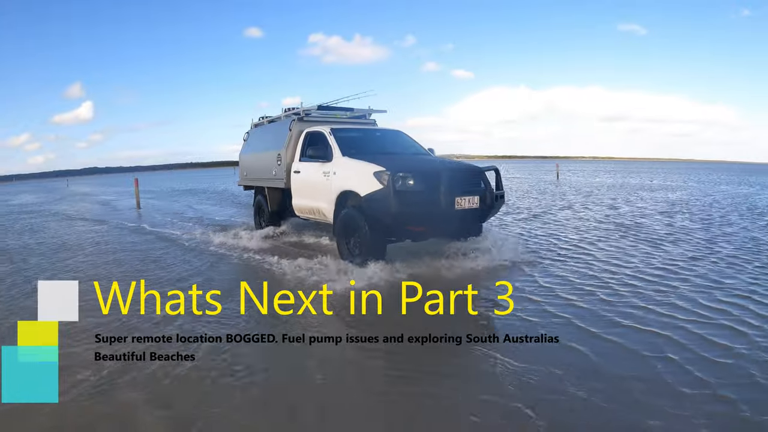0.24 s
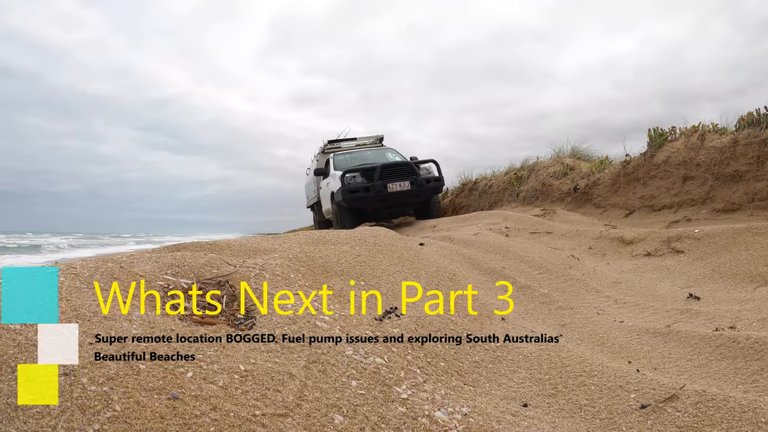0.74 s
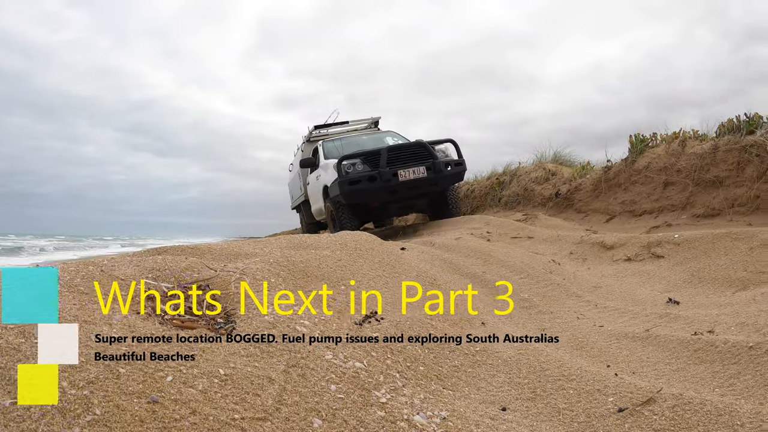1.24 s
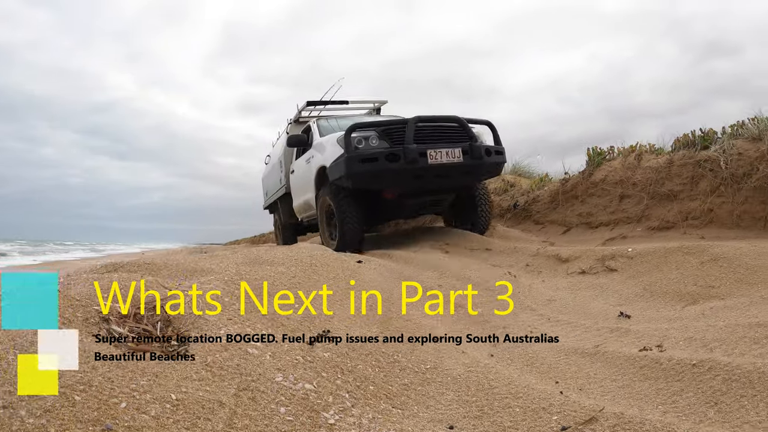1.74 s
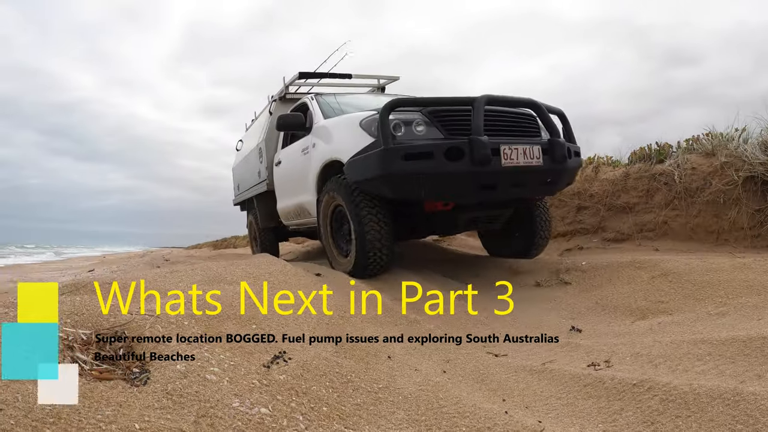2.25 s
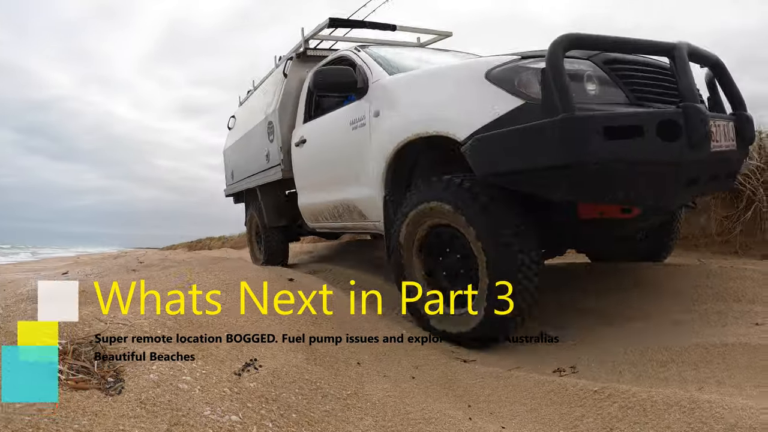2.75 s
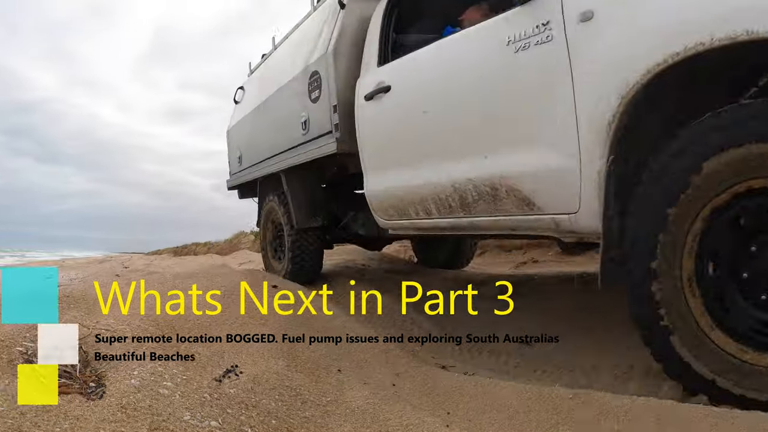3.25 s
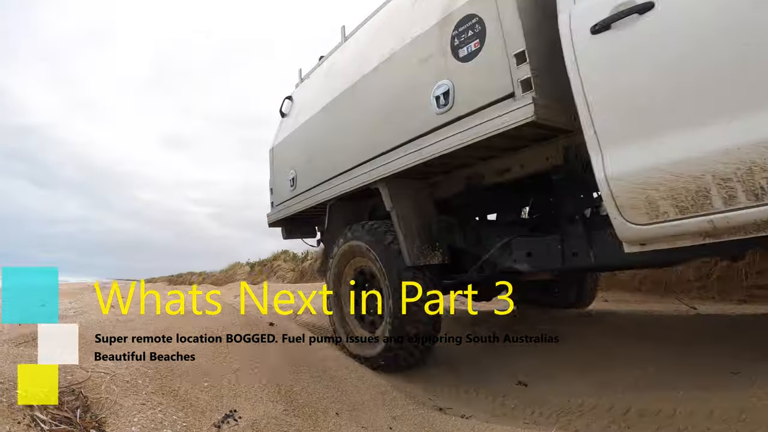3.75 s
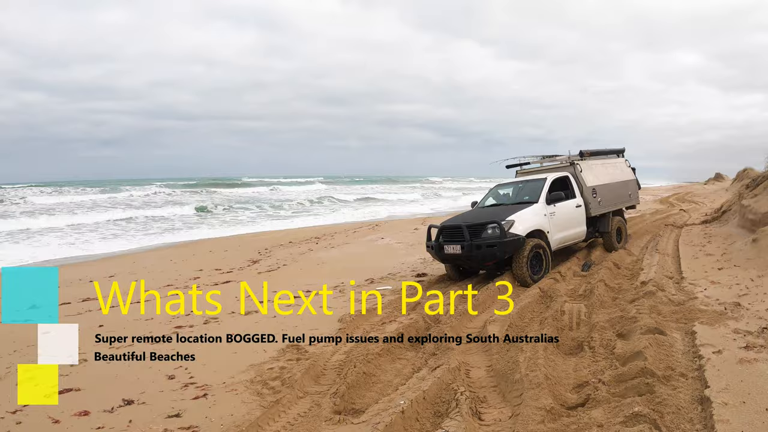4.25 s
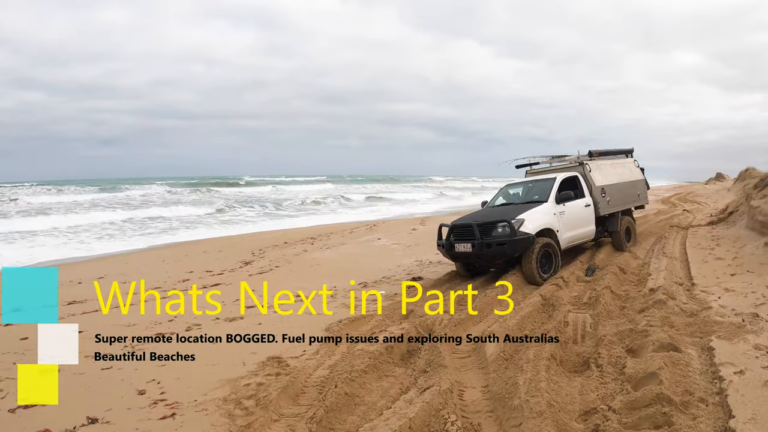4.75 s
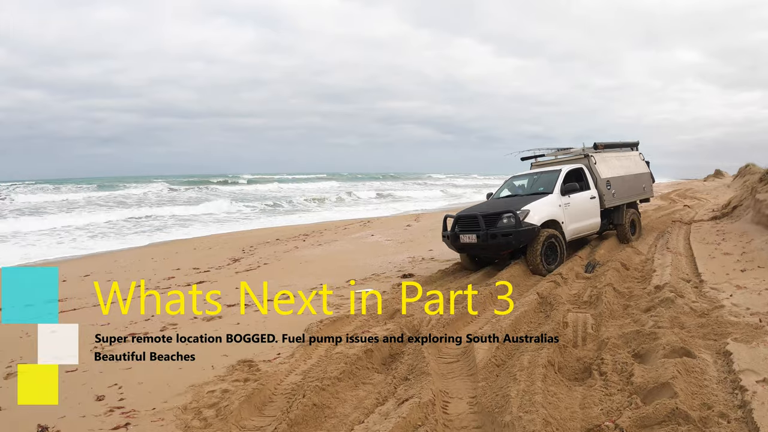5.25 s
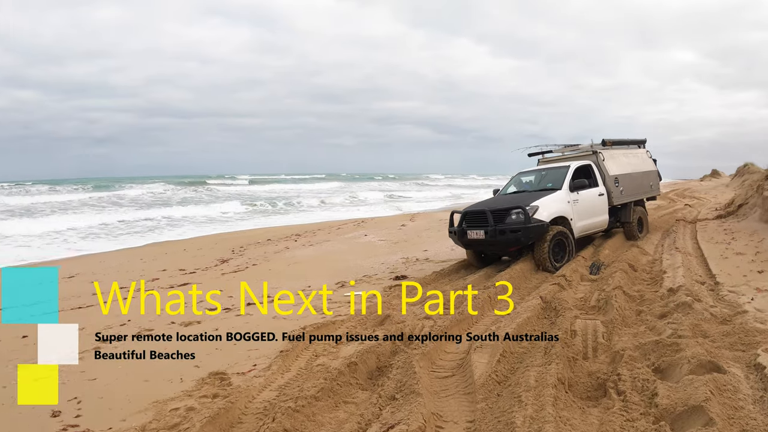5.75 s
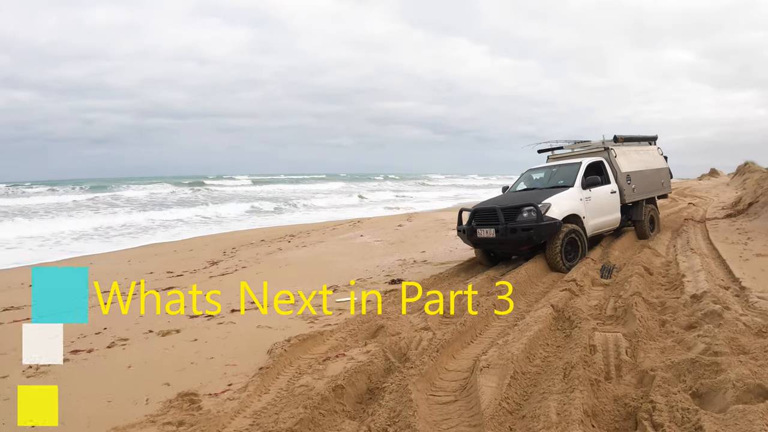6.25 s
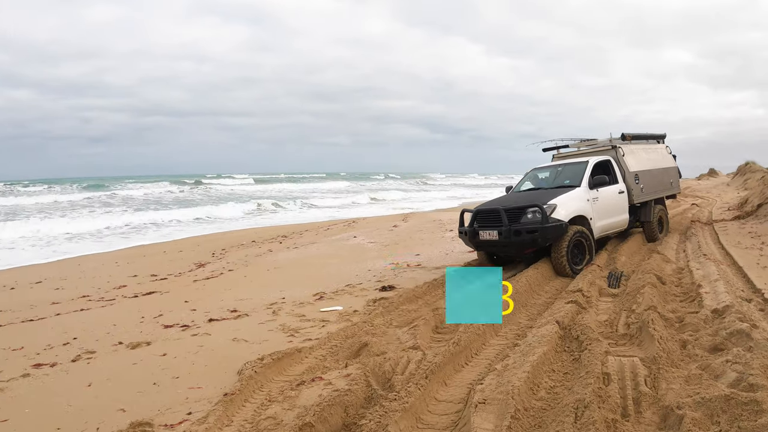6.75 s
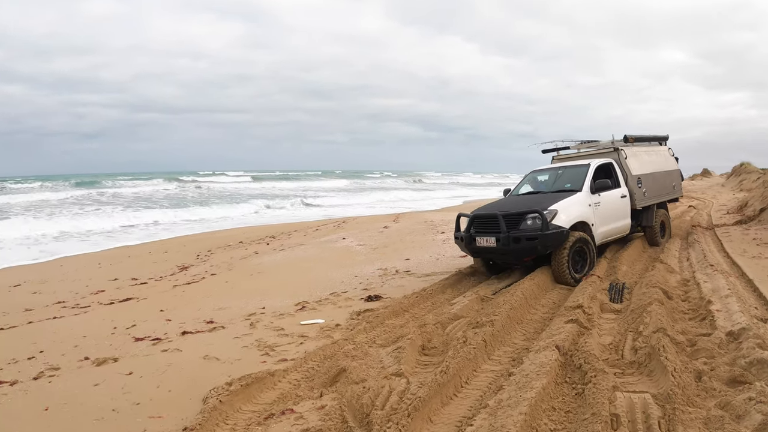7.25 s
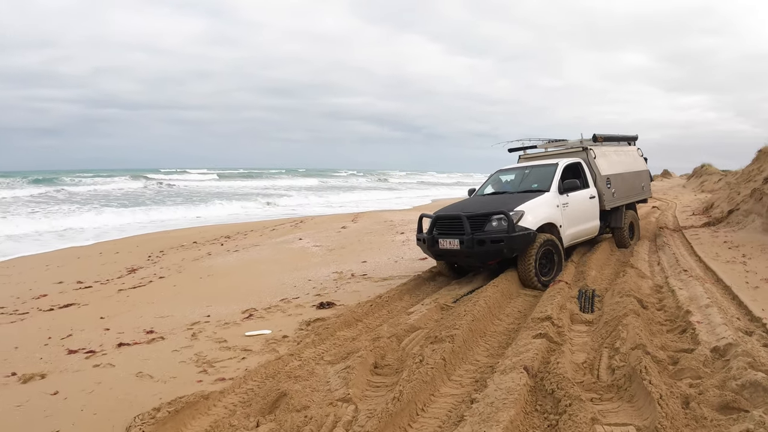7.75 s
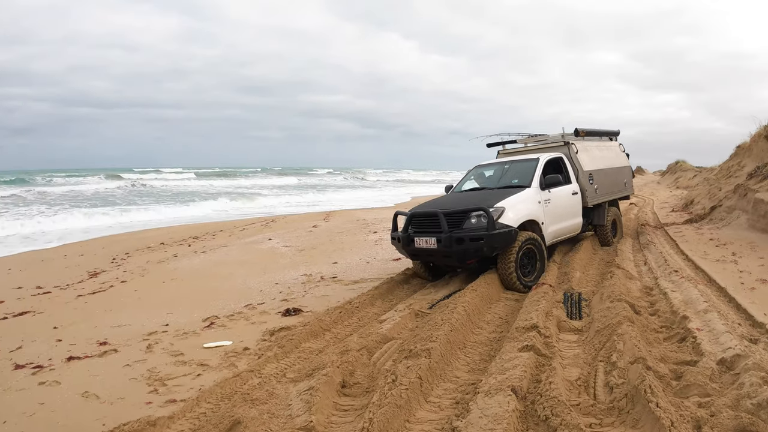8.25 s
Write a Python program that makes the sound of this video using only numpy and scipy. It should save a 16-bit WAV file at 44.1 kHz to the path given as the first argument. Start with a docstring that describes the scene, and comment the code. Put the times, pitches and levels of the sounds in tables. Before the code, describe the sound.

A vehicle ploughs through shallow water for a moment, slapping and bubbling. Abruptly it is on soft sand, a low diesel throb with clattering knock, straining, dipping and revving again as it approaches and passes the microphone. Then, abruptly, an even exhaust drone on an open beach over steady breakers and soft foam hiss, slowly losing revs. Gusty wind rumbles throughout, with a few faint, thin metallic squeals.

```python
"""Water churns, bubbles and slaps as a four-cylinder diesel four-wheel drive ploughs through the shallows.
Then it climbs a dune past the microphone in three surges of throttle, and last drones beside the surf with
sagging revs. The exhaust is harmonics of the firing rate coloured by pipe resonances; on the dune noise
bursts knock on the block and shaped noise makes the sand. Wind rumbles on the microphone throughout."""
import sys
import numpy as np
from scipy import signal
from scipy.fft import rfft, irfft, next_fast_len
from scipy.io import wavfile
from scipy.ndimage import uniform_filter1d, map_coordinates

SR = 44100
rng = np.random.default_rng(int(sys.argv[2]) if len(sys.argv) > 2 else 0)


def bounce(signal):
    """Save signal as a 16-bit WAV file at the path given by the first command-line argument."""
    frames = np.transpose(np.atleast_2d(signal))
    limited = np.clip(frames, -1, 1)
    pcm = np.round(limited * 32767).astype(np.int16)
    wavfile.write(sys.argv[1], SR, pcm)


N = 374409

CLIMB_START, BEACH_START = .452, 4.268  # seconds
ALONGSIDE_S, CLEAR_S = 3.285, 0.33  # the tailpipe comes out from behind the truck, and how long that takes
SHADOW_S, SHADOW_FADE_S = 3.88, 0.26  # the body moves in front of the engine bay and front wheels
PIPE_HZ = 157  # resonance of the exhaust pipe on the dune

# Surges of throttle on the dune. Each row: start in seconds, attack in seconds, straining for seconds,
# pulling for seconds, release in seconds, pull 0-1, strain 0-1, extra knock in dB, extra pipe tone in dB.
THROTTLE_SURGES = [(.76, 0.48, 0.88, 0.93, 0.26, .7, 0.17, 3.5, 6.5),
                   (2.37, 0.16, 0.26, .56, 0.33, 1.0, 0.72, 11, 3),
                   (3.331, 0.15, .32, 0.94, .3, 1.0, 0.7, 8.5, 3.5)]


def amp(db):
    """Decibels to gain."""
    return 10 ** (np.asarray(db) / 20)


def unit(x):
    """Scale to rms 1."""
    return x / np.sqrt(np.mean(x ** 2) + 1e-20)


def curves(rows):
    """One value per sample for each column after the time."""
    s, *cols = np.transpose(rows)
    return [np.interp(np.arange(N) / SR, s, c) for c in cols]


def wobble(rate):
    """A smooth random curve, rate knots a second."""
    knots = rng.standard_normal(int(N * rate / SR) + 4)
    return map_coordinates(knots, [np.arange(N) * rate / SR])


def filtered(x, response):
    """x times a response of frequency."""
    size = next_fast_len(N + SR // 2)
    return irfft(rfft(x, size) * response(np.fft.rfftfreq(size, 1 / SR)), size)[:N]


def coloured(x, spectrum):
    """x shaped by (Hz, dB) points, at rms 1."""
    f, db = np.transpose(spectrum)
    return unit(filtered(x, lambda hz: amp(np.interp(np.log(hz + 1), np.log(f), db))))


def rush(spectrum, patchy_db):
    """Turbulent noise of rms 1, with patches of random gain in time and pitch."""
    z = signal.stft(rng.standard_normal(N), nperseg=512)[2]
    across_pitch = uniform_filter1d(rng.standard_normal(z.shape), size=6, axis=0)
    field = uniform_filter1d(across_pitch, size=10, axis=1)
    patchy = signal.istft(z * amp(patchy_db * unit(field)), nperseg=512)[1][:N]
    return coloured(patchy, spectrum)


def ringing(drive, centre_hz, width_hz):
    """One narrow resonance shaken by drive, at rms 1."""
    return unit(filtered(drive, lambda f: 1 / (1 + (2 * (f - centre_hz) / width_hz) ** 2)))


def shot(start, end):
    """Gate that is open for one scene."""
    t = np.arange(N) / SR
    return uniform_filter1d(1. * ((t >= start) & (t < end)), size=20)


def rise(start, length):
    """A smooth step from 0 to 1."""
    u = np.clip((np.arange(N) / SR - start) / length, 0, 1)
    return np.sin(np.pi / 2 * u) ** 2


def swell(peak, length):
    """A smooth hump from 0 to 1 and back."""
    return rise(peak - length / 2, length / 2) - rise(peak, length / 2)


def swells(rows, floor_db):
    """Gain of a floor with (peak s, length s, dB) humps added in power."""
    humps = sum(amp(db) ** 2 * swell(s, length) for s, length, db in rows)
    return np.sqrt(amp(floor_db) ** 2 + humps)


def wind(dune_db=-37, beach_db=-32):
    """A breeze buffets the microphone in gusts; it is fresher on the open beach."""
    # Each row: peak in seconds, length in seconds, level in dB.
    gusts = [(.2, 0.57, -19.5), (.8, 0.57, -23), (2.2, 0.97, -34.5), (4.37, 0.3, -25.5), (4.85, .4, -27.5),
             (5.28, 1, -24.5), (6.1, .6, -26), (6.76, 0.57, -27), (7.6, 0.87, -28.5), (8.47, .3, -25)]
    # Spectrum of air buffeting the microphone. Each row: frequency in Hz, relative level in dB.
    buffet = [(8, -23.5), (20, -9.5), (35, -6), (60, -4), (100, -14.5), (200, -12), (500, -53),
              (3000, -120)]
    breeze_db = dune_db + (beach_db - dune_db) * shot(BEACH_START, N / SR)
    return swells(gusts, floor_db=breeze_db) * coloured(rng.standard_normal(N), buffet)


def surf(breaker_db=-24.5, foam_db=-43):
    """Breakers roar steadily, waves rush up the sand and their foam hisses evenly, then drains away."""
    # Waves running up the sand. Each row: peak in seconds, length in seconds, level in dB.
    waves = [(4.47, 1, -42.5), (5.67, .3, -46), (6.25, 0.85, -46.5), (7.3, 0.55, -54), (8.15, 1, -53)]
    # Spectra of distant roar, water on sand, and foam. Each row: frequency in Hz, relative level in dB.
    breakers = [(20, -30), (60, -0.5), (120, 1), (210, -1), (300, -9), (420, -11.5), (580, -14),
                (1000, -27), (2000, -44), (16000, -120)]
    swash = [(200, -39.5), (600, -15.5), (950, 1.5), (1400, -5.5), (2500, -22.5), (16000, -86)]
    foam = [(100, -52), (900, -5), (1600, 0.5), (2600, -0.5), (4000, -4.5), (6000, -13), (8000, -17.5),
            (10000, -28), (12000, -38.5), (15500, -64.5)]
    foam_peak_s, foam_fade_db_per_s = 6.11, 2.5
    draining = np.maximum(np.arange(N) / SR - foam_peak_s, 0)
    roar = amp(breaker_db) * rush(breakers, patchy_db=1.0)
    run_up = swells(waves, floor_db=-49.5) * rush(swash, patchy_db=1.0)
    hiss = amp(foam_db - foam_fade_db_per_s * draining) * rush(foam, patchy_db=1.2)
    return roar + run_up + hiss


def squeals(waver_hz=80, flutter_db=4):
    """Rubbing metal in the running gear sings briefly, fluttering in pitch and strength."""
    # Each row: start in seconds, length in seconds, pitch in Hz, level in dB before the flutter.
    thin_squeals = [(1.88, 0.25, 9350, -63), (2.70, .15, 9400, -57), (2.83, .12, 9430, -64),
                    (5.48, 0.18, 8000, -58), (6.83, 0.1, 8500, -66), (6.93, .12, 7690, -62)]
    t, out = np.arange(N) / SR, np.zeros(N)
    waver, flutter = waver_hz * wobble(250), unit(amp(flutter_db * wobble(70)))
    for s, length, hz, db in thin_squeals:
        arch = np.sin(np.pi * np.clip((t - s) / length, 0, 1))
        out += amp(db) * arch * np.sin(2 * np.pi * np.cumsum(hz + waver) / SR)
    return out * flutter


def water(churn_db=-21, bubble_db=-38, bubble_hz=560, count=150):
    """The bow wave churns, bubbles ring with rising pitch, and water thrown by the wheels slaps down."""
    # Each row: start in seconds, level in dB, time to decay by 60 dB in seconds.
    splashes = [(0.038, -20, 0.14), (.079, -25.5, 0.13), (.122, -25.5, 0.14), (.156, -26, 0.094),
                (0.207, -20.5, 0.19), (0.246, -16, 0.052), (.314, -30, .1), (.368, -30, 0.15)]
    # Spectrum of the bow wave. Each row: frequency in Hz, relative level in dB.
    wash = [(20, -28.5), (50, -4), (110, -5.5), (220, -6), (400, -12), (520, -19), (900, -27), (1400, -34),
            (2200, -37), (4200, -39.5), (6500, -48.5), (9000, -58), (12000, -71), (16000, -98)]
    t = np.arange(SR // 8) / SR
    bubbles, slaps = np.zeros(N), np.zeros(N)
    for when, pitch, size in rng.random((count, 3)):
        hz = bubble_hz * 3 ** (2 * pitch - 1)
        age = hz * t / 6  # a bubble lives for a few cycles
        glide = 1 + .05 * np.minimum(age, 2)
        envelope = np.exp(-2 * age) * (1 - np.exp(-20 * age))
        ring = np.sin(2 * np.pi * hz * t * glide) * envelope
        bubbles[int(when * CLIMB_START * SR):][:len(t)] += amp(bubble_db + 10 * size) * ring
    for s, db, t60 in splashes:
        slaps[int(s * SR):][:len(t)] += amp(db - 60 * t / t60) * (1 - np.exp(-t / 0.00074))
    spray = rush([(50, -23), (500, 2.5), (950, -2.5), (1500, -12.5), (2500, -19.0), (5000, -36),
                  (15000, -77.5)], patchy_db=-1.0)
    # the wave heaves up with the first splash, then sags
    heave_db = 5 * rise(start=0.024, length=.03) - 0.9 * rise(start=0.237, length=0.029)
    churn = amp(churn_db + heave_db + 0.27 * wobble(13)) * rush(wash, patchy_db=1.86)
    return churn + bubbles + slaps * spray


def throttle(lag_s=0):
    """Pull and pipe tone (dB) last through each surge; strain and extra knock (dB) ease off on their own."""
    ease_s = 0.27  # how long the strain takes to let go
    pull, strain, knocking, piping = np.zeros((4, N))
    for (start, attack, straining, pulling, release,
         pull_depth, strain_depth, knock_db, pipe_db) in THROTTLE_SURGES:
        press = rise(start + lag_s, attack)
        fight = press * (1 - rise(start + straining, ease_s))
        held = press * (1 - rise(start + pulling, release))
        pull += pull_depth * held
        strain += strain_depth * fight
        knocking += knock_db * fight
        piping += pipe_db * held
    return pull, strain, knocking, piping


def effort(idle_db, pull_db=0, strain_db=0, lag_s=0):
    """Gain of a layer that moves from its idle level with the throttle."""
    pull, strain, *_ = throttle(lag_s)
    return amp(idle_db + pull_db * pull + strain_db * strain)


def ruts():
    """Dull thudding of the tyres and suspension on uneven sand."""
    # Each row: peak in seconds, length in seconds, level in dB.
    thuds = [(2.37, .35, -26.5), (3.58, .25, -28.5)]
    dull = rush([(30, -20), (80, -0.5), (130, 1), (260, -11), (500, -27.5), (2000, -70)], patchy_db=1.0)
    return swells(thuds, floor_db=-80) * dull


def tyres(slowing_db_per_s=1.17, near_db=5, roll_shadow_db=-1, hiss_shadow_db=-6.0):
    """Treads rumble less as the truck loses way and spill hissing, gritty sand, most when the wheels dig in."""
    # Fine sand flung off the treads. Each row: peak in seconds, length in seconds, level in dB.
    spills = [(1.02, .25, -66), (1.62, 0.22, -68.5), (2.4, .35, -60.5)]
    # Spectra of the rumbling treads and the gritty sand. Each row: frequency in Hz, relative level in dB.
    treads = [(15, -33), (50, 1.5), (130, 6), (220, 0), (320, -5.5), (450, -8.5), (700, -15.5),
              (1000, -21.5), (1500, -26.5), (4000, -56.5), (16000, -120)]
    sand = [(100, -47.5), (900, -23.5), (2000, 2.5), (4000, 1), (6000, -4), (8500, -8), (10000, -13.5),
            (12000, -23), (15500, -25)]
    shadow = rise(SHADOW_S, SHADOW_FADE_S)
    passing = amp(near_db * rise(ALONGSIDE_S, CLEAR_S) + roll_shadow_db * shadow)
    slowing = amp(-slowing_db_per_s * np.arange(N) / SR)
    roll = effort(idle_db=-27, pull_db=-1.5, strain_db=5.5) * slowing * passing
    hiss = effort(idle_db=-52.5, strain_db=8.5) * amp(hiss_shadow_db * shadow)
    grit = rng.standard_normal(N) * amp(1.3 * wobble(900))
    fine_sand = coloured(rng.standard_normal(N), [(2500, -26), (7000, 0.5), (11500, -12.5), (15500, -11.5)])
    flung = swells(spills, floor_db=-90.5) * fine_sand
    return roll * rush(treads, patchy_db=0.9) + hiss * coloured(grit, sand) + flung


def underbody(level_db=-46):
    """The underbody rings at one resonance, loudest as it passes nearest the microphone."""
    nearest_s, half_pass_s = 3.8, 0.19
    closeness = 1 / (1 + ((np.arange(N) / SR - nearest_s) / half_pass_s) ** 2)
    return amp(level_db) * closeness * ringing(rng.standard_normal(N), centre_hz=940, width_hz=120)


def knock(turns, idle_db=-49, lift_db=2.5, shadow_db=-6, chatter_db=-8.0, tick_db=-57.0, facing_db=3.5):
    """Each firing strikes the block with a noise burst, harder under strain and as the throttle closes."""
    # Knock of each cylinder in firing order, relative level in dB.
    cylinders = [1, 0, 1.5, -3]
    # How much the body hides the engine bay. Each row: time in seconds, share of the knock smeared 0-1.
    hidden = [(.5, .65), (1, .25), (1.9, .12), (2.2, .6), (2.55, .25), (3.1, .25), (3.7, .75), (4.2, .9)]
    # Resonances of the engine block. Each row: centre in Hz, width in Hz, relative level in dB.
    block_modes = [(790, 360, -3.5), (1202, 160, 5), (1810, 260, 2.5), (2900, 450, -2.5), (3400, 260, -2.5),
                   (3950, 760, -8), (4970, 960, -12.5)]
    firing, age = turns.astype(int), turns % 1
    uneven_db = rng.standard_normal(1024)[firing]
    strength = amp(np.take(cylinders, firing, mode="wrap") + uneven_db)
    bursts = unit(strength * age * np.exp(-age / .22))
    smeared = np.clip(curves(hidden)[0], 0, 1)
    envelope = np.sqrt(smeared + (1 - smeared) * bursts ** 2)
    blows, rattle, ticks = envelope * rng.standard_normal((3, N))

    def block(f):
        """Sum of the block's resonances with alternating sign."""
        return sum((-1) ** k * amp(db) * 1j * f * w / (c * c - f * f + 1j * f * w)
                   for k, (c, w, db) in enumerate(block_modes))

    lifts = sum(swell(start + pulling + 0.58 * release, length=0.43)
                for start, _, _, pulling, release, *_ in THROTTLE_SURGES)
    shadow = rise(SHADOW_S, SHADOW_FADE_S)
    level = amp(idle_db + throttle()[2] + lift_db * lifts + shadow_db * shadow)
    clatter = level * unit(filtered(blows, lambda f: block(f) / (1 + (f / 6500) ** 6)))
    # two high resonances of the engine bay carry through the grille and fade as it turns away
    facing = rise(start=0.86, length=0.23) - rise(start=1.5, length=.4)
    turned_away = rise(start=2.75, length=0.58)
    chatter_gain = amp(chatter_db + facing_db * facing) * level * (1 - turned_away)
    chatter = chatter_gain * ringing(rattle, centre_hz=3020, width_hz=750)
    ticking = amp(tick_db) * facing * ringing(ticks, centre_hz=4900, width_hz=330)
    return clatter + chatter + ticking


def tone(turns, multiple, rough):
    """One multiple of the firing rate; uneven firings shake its strength."""
    swing = 1 + rough * wobble(45)
    lag = multiple ** 2 / 8  # the pipe delays high orders more and so smears each pulse
    return np.sqrt(2) * swing * np.sin(2 * np.pi * (multiple * turns - lag))


def pipe_gain(hz, width_hz, centre_hz=PIPE_HZ):
    """How strongly the exhaust pipe answers a harmonic at hz."""
    return 1 / np.sqrt(1 + (2 * (hz - centre_hz) / width_hz) ** 2)


def beach_engine(firing_db=-20.5, firing_db_per_octave=14, firing_sag_db_per_s=1.56, pipe_db=-16.0,
                 uneven_db=-12, third_db=-21, firing_lift_db=-4, pipe_lift_db=-20):
    """As revs sag the firing tone weakens and its second harmonic sinks through the pipe's resonance."""
    # Engine speed along the beach. Each row: time in seconds, firings per second.
    beach_speed = [(4.27, 93.6), (4.45, 93.9), (5.9, 88.3), (6.12, 86.2), (6.5, 74.8), (6.7, 71.7),
                   (8.07, 72.6), (8.24, 64.5), (8.49, 60.6)]
    lift_s, release_s = 8.11, 0.26  # the driver lifts off
    speed, = curves(beach_speed)
    turns = np.cumsum(speed) / SR
    lifted = rise(lift_s, release_s)
    sag_db = firing_sag_db_per_s * np.maximum(np.arange(N) / SR - BEACH_START, 0)
    revs_db = firing_db_per_octave * np.log2(speed / 90)
    firing = amp(firing_db + revs_db + firing_lift_db * lifted - sag_db + 0.65 * wobble(6))
    resonance = pipe_gain(2 * speed, width_hz=45.3, centre_hz=152.8)
    pipe = amp(pipe_db + pipe_lift_db * lifted) * resonance
    between = tone(turns, 3 / 2, rough=.3)  # unequal cylinders add a line between the harmonics
    third = tone(turns, 3, rough=.4)
    low = tone(turns, 1, rough=0.079) + amp(uneven_db) * between
    drone = tone(turns, 2, rough=0.12) + amp(third_db) * third
    return firing * low + pipe * drone


def climb_exhaust(speed, turns, rasp_db=-1, fall_db=10, near_bright_db=1.5, uneven_db=-19, puff_db=-5,
                  near_first_db=13, near_boom_db=3, near_pipe_db=-2.0, boom_db_per_octave=24,
                  approach_db_per_s=1.35):
    """The low two harmonics boom nearby, the third meets the pipe's resonance, the rest sink into gas puffs."""
    near = rise(ALONGSIDE_S, CLEAR_S)
    approach = amp(approach_db_per_s * np.minimum(np.arange(N) / SR - ALONGSIDE_S, 0))
    first_gain = effort(idle_db=-39, pull_db=4.5, strain_db=5.0) * amp(near_first_db * near)
    first = first_gain * tone(turns, 0.98, rough=0.11)
    revs_db = boom_db_per_octave * np.log2(speed / 50)
    boom = effort(idle_db=-27.5, pull_db=3.5, strain_db=-0.5) * amp(near_boom_db * near + revs_db)
    second = boom * tone(turns, 2, rough=0.086)
    piping_db = throttle(lag_s=0.12)[3] + near_pipe_db * near
    pipe = effort(idle_db=-23.5, strain_db=8.5, lag_s=0.072) * amp(piping_db)
    pipe = pipe * pipe_gain(3 * speed, width_hz=28.6)
    third = tone(turns, 3, rough=.1)
    rasp = effort(idle_db=-35.0, pull_db=8.5, strain_db=6.5)
    step_db = fall_db - near_bright_db * near  # the open tailpipe sounds brighter
    upper = sum(amp(rasp_db - step_db * (k - 4)) * tone(turns, k, rough=.2) for k in range(4, 7))
    # a broader resonance lifts the overtones at middling revs
    carry = pipe_gain(4 * speed, width_hz=130, centre_hz=192.5)
    # unequal cylinders add weak lines halfway between the harmonics
    halves = tone(turns, 5 / 2, rough=.5) + tone(turns, 7 / 2, rough=.5)
    gas = rng.standard_normal(N) * (1 + np.cos(2 * np.pi * turns))
    puffs = coloured(gas, [(60, -24.5), (170, 1.5), (250, -12.0), (310, -10.0), (400, -20), (3000, -110)])
    body = approach * (second + pipe * (third + amp(uneven_db) * halves))
    return first + body + rasp * (carry * upper + amp(puff_db) * puffs)


def climb():
    """The truck labours up the dune and passes close by, exhaust and knock following one engine speed."""
    # Engine speed on the dune. Each row: time in seconds, firings per second.
    climb_speed = [(.45, 60.6), (.75, 55.3), (1.02, 51.3), (1.76, 53), (2.0, 43.2), (2.15, 40.5),
                   (2.46, 40.4), (2.7, 52), (2.82, 56), (3.3, 45.6), (3.43, 45.8), (3.8, 61), (3.88, 62.5),
                   (4.1, 56.5), (4.27, 53.4)]
    speed, = curves(climb_speed)
    turns = np.cumsum(speed) / SR  # firings so far
    return climb_exhaust(speed, turns) + knock(turns) + tyres() + ruts() + underbody()


def scene():
    """Water, dune and beach follow each other with hard cuts under the squeals and wind."""
    ford = shot(0, CLIMB_START) * water()
    dune = shot(CLIMB_START, BEACH_START) * climb()
    beach = shot(BEACH_START, N / SR) * (beach_engine() + surf())
    return (ford + dune + beach + squeals() + wind())[None]


def record(dry):
    """The recorder keeps nothing above its band limit."""
    top_hz = 15735
    return filtered(dry[0], lambda hz: hz < top_hz)[None]


dry = scene()
out = record(dry)
bounce(out)
```